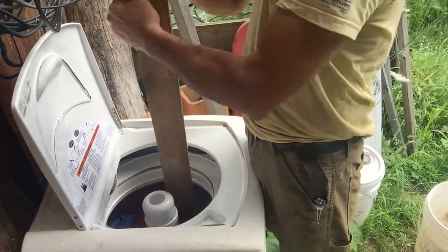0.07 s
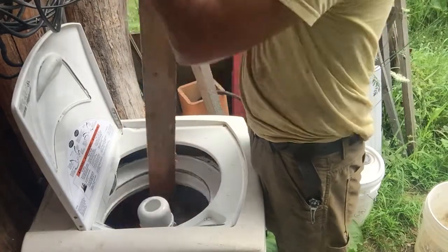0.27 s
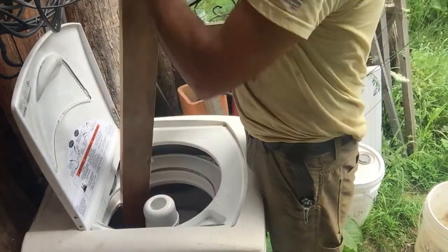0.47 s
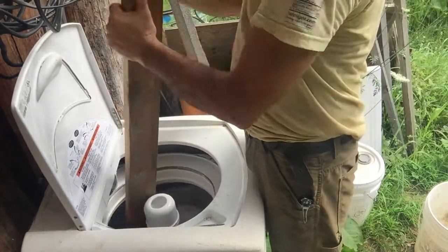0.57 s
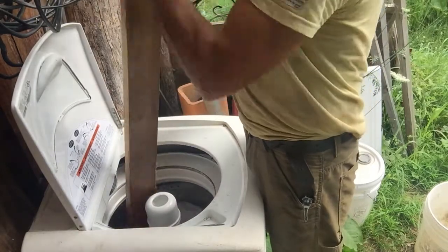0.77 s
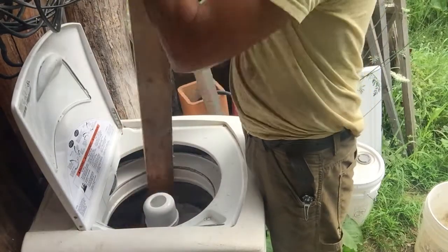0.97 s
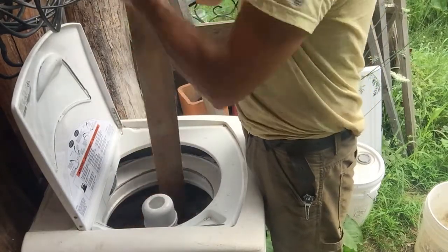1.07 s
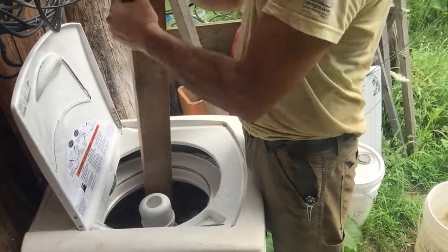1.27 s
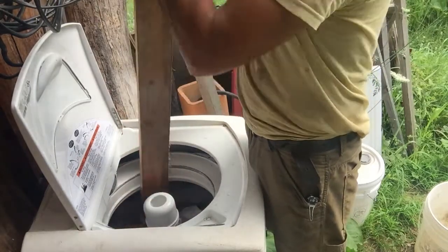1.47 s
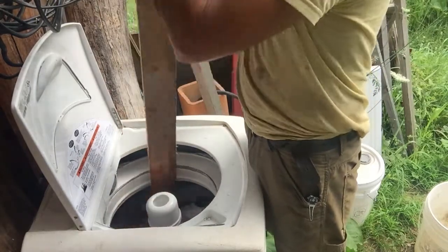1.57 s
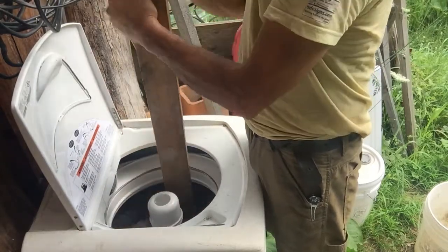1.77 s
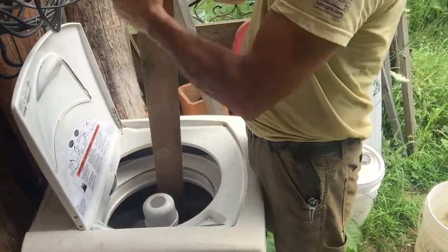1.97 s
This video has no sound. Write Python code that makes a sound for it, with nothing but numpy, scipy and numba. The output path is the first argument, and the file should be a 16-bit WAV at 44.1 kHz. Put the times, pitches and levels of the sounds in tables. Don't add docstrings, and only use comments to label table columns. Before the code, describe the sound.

Splashing water and wet slaps from laundry worked with a wooden board in a washer tub, low cabinet thuds and thin trickling between pushes, one brief bird cry midway, quiet outdoors, mono handheld phone pickup.

```python
import sys
import numpy as np
from scipy import signal
from scipy.fft import rfft, irfft
from scipy.io import wavfile
from scipy.ndimage import uniform_filter1d
from numba import njit

SR = 44100
rng = np.random.default_rng(int(sys.argv[2]) if len(sys.argv) > 2 else 0)


def gain_from_db(level_db):
    decades = np.asarray(level_db, float) / 20
    return 10 ** decades


def dump_mix(stems):
    frames = np.atleast_2d(stems).T
    limited = np.clip(frames, -1, 1)
    pcm = np.round(limited * 32767).astype(np.int16)
    wavfile.write(sys.argv[1], SR, pcm)


N = 89258


def level(x, db):
    return x * gain_from_db(db) / np.sqrt(np.mean(x ** 2))


def noise(shape):
    hz, db = np.array(shape, float).T
    f = np.arange(1, N // 2 + 2) * SR / N
    gain = gain_from_db(np.interp(np.log(f), np.log(hz), db))
    return level(irfft(rfft(rng.standard_normal(N)) * gain, N), 0)


def walk(rate_hz):
    hold = int(SR / rate_hz)
    steps = np.repeat(rng.standard_normal(N // hold + 1), hold)
    return 1.3 * uniform_filter1d(uniform_filter1d(steps, hold), hold)[:N]


def swell(peak_s, rise_s, fall_s, db):
    t = np.arange(N) / SR - peak_s
    away = np.where(t < 0, -t / max(rise_s, .003), t / max(fall_s, .003))
    return gain_from_db(2 * (db - 30 * away))


@njit
def grains(count, at, hz, t60, size, glide):
    out = np.zeros(count)
    for g in range(len(at)):
        span, phase = int(t60[g] * SR), 0.
        for i in range(min(span, count - at[g])):
            phase += 2 * np.pi * hz[g] * (1 + glide * i / span) / SR
            out[at[g] + i] += size[g] * min(phase / 7, 1.) * np.exp(-7 * i / span) * np.sin(phase)
    return out


def drops(centre_hz, spread_oct, cycles, scatter_db, count):
    loudest_db, glide = 11, 0.16
    at = rng.integers(0, N, count)
    hz = np.clip(centre_hz[at] * 2 ** (spread_oct * rng.standard_normal(count)), 300, 15000)
    size = gain_from_db(np.minimum(scatter_db * rng.exponential(size=count), loudest_db))
    return level(grains(N, at, hz, 2 * cycles / hz, size, glide), 0)


def bubbles(table):
    s, hz, db, t60 = np.array(table).T.copy()
    return grains(N, (s * SR).astype(np.int64), hz, t60, gain_from_db(db), .06)


# (time [s], level [dB])
TRICKLE_LEVEL = [(0, -56.5), (.22, -83), (.27, -62), (.54, -62), (.8, -62), (.9, -76.5), (1.11, -75.5),
                 (1.5, -75.5), (1.6, -66), (1.8, -66), (2.02, -58.5)]
# (frequency [Hz], level [dB per Hz])
TRICKLE_HISS = [(150, -11), (900, -6.5), (1800, 4.5), (2600, -8.5), (3600, -6), (5200, -8), (7000, -24),
                (16000, -45)]


def trickle():
    s, db = np.array(TRICKLE_LEVEL).T
    pitch_hz = np.full(N, 1704.)
    shower = drops(pitch_hz, spread_oct=.2, cycles=14, scatter_db=4, count=1500)
    wet = gain_from_db(-8.5) * shower + noise(TRICKLE_HISS)
    return wet * gain_from_db(np.interp(np.arange(N) / SR, s, db) + 1.2 * walk(24.67))


# (frequency [Hz], level [dB per Hz])
YARD_SPECTRUM = [(20, 0.5), (100, -8), (300, -16), (550, -9), (900, -18), (3200, -14), (6000, -26.5),
                 (16000, -37.5)]


def yard():
    return noise(YARD_SPECTRUM) * gain_from_db(-68.5 + 2.05 * walk(3.77))


# (peak time [s], rise [s per 30 dB], fall [s per 30 dB], level [dB], hardness [dB])
THUDS = [(0.1307, 0, 0.087, -48, -5), (0.576, 0.0146, 0.17, -49, 1.5), (0.692, 0.17, 0.04, -48, 3.5),
         (0.7623, 0.15, 0.14, -47.5, -6), (1.1618, 0.04, 0.1, -57, 2), (1.3156, 0.22, 0.18, -57.5, 4),
         (1.379, 0.2, 0.1, -48.5, -9.5), (1.827, 0.12, 0.38, -53.6, -3), (2.0253, 0.13, 0.095, -49.5, -5),
         (0.4194, 0.025, 0.15, -66.0, 3), (1.5744, 0.061, -0.16, -70, 5),
         (1.9796, -0.02, -0.23, -54.5, 2.5), (0.008, 0.5, -0.1, -63.5, -1),
         (0.2481, 0.101, 0.1, -69.5, 3.5), (0.509, .02, -0.06, -63, 3)]
# (frequency [Hz], level [dB per Hz])
THUD_SPECTRUM = [(25, -2), (60, -4), (130, -6), (250, -9), (550, -9), (1100, -14), (2000, -46)]


def thuds():
    boom = noise(THUD_SPECTRUM)
    boom = boom / np.sqrt(uniform_filter1d(boom ** 2, size=1800))
    split_hz = 310
    low = signal.sosfiltfilt(signal.butter(2, split_hz, fs=SR, output="sos"), boom)
    deep = np.sqrt(sum(swell(*row[:4]) for row in THUDS))
    hard = np.sqrt(sum(swell(*row[:4]) * gain_from_db(2 * row[4]) for row in THUDS))
    return (deep * low + hard * (boom - low)) * gain_from_db(3.0)


# (peak time [s], rise [s per 30 dB], fall
# [s per 30 dB], level [dB], droplet pitch [Hz])
SURGES = [(0.0143, 0.068, 0.108, -50.7, 2800), (0.0432, 0.16, 0.023, -40.6, 3200),
          (0.099, 0.07, 0.125, -40.5, 2900), (0.1691, 0.129, 0.094, -52.1, 3200),
          (0.3446, 0.035, 0.045, -51.3, 2200), (0.422, 0.031, 0.056, -55.4, 2500),
          (0.5045, 0.003, 0.04, -54.5, 2200), (0.5722, 0.004, 0.04, -23.5, 4600),
          (0.6, 0.05, 0.134, -33.2, 4000), (0.683, 0.019, 0.085, -28.5, 3700),
          (0.708, 0.016, 0.035, -24, 3200), (0.7358, 0.05, 0.13, -34, 3200),
          (0.791, 0.09, 0.035, -36.5, 3600), (1.1607, 0.025, 0.098, -43.8, 2500),
          (1.1975, 0.081, 0.09, -50.9, 7500), (1.2657, 0.099, 0.193, -43.3, 3800),
          (1.3133, 0.07, 0.108, -40.2, 3300), (1.3485, 0.12, 0.02, -42.9, 2000),
          (1.4098, 0.16, 0.038, -47.2, 2500), (1.4317, 0.017, 0.06, -46, 5000),
          (1.5558, 0.037, 0.131, -52.8, 2200), (1.8165, 0.012, 0.06, -30, 4400),
          (1.8675, 0.035, 0.06, -37, 3000), (1.971, 0.058, 0.067, -42.2, 4200),
          (0.2385, 0.003, 0.06, -43.5, 3200), (0.245, 0.012, 0.015, -41.5, 2600),
          (0.3176, 0.005, 0.045, -51.2, 3500), (0.5649, 0.003, 0.121, -42.5, 4500),
          (0.6704, 0.006, 0.119, -39.6, 5500), (0.7259, 0.003, 0.026, -32.4, 7000),
          (0.9518, 0.004, 0.045, -55.4, 4000), (1.15, 0.02, 0.12, -54, 5200),
          (1.9439, 0.003, 0.041, -45.8, 4000), (0.0692, 0.01, 0.053, -48.7, 3000),
          (1.456, 0.03, 0.04, -58, 2500), (1.9101, 0.016, 0.033, -49.4, 2800),
          (1.9855, 0.078, 0.026, -47.3, 3200), (2.0097, 0.02, 0.099, -53.6, 5500),
          (1.8075, 0.016, 0.073, -35, 4500)]
# (frequency [Hz], level [dB per Hz])
SPRAY_SPECTRUM = [(150, -23.5), (500, -14), (950, -11), (1400, -5.5), (4200, -4.5), (6500, -14.5),
                  (11000, -25), (16000, -38.5)]


def surges():
    pushes = SURGES
    power = np.array([swell(*row[:4]) for row in pushes]) + 1e-14
    total = power.sum(0)
    pitch_hz = np.exp(np.log([row[4] for row in pushes]) @ power / total)
    spray = noise(SPRAY_SPECTRUM) * gain_from_db(-4.5 + 2.45 * walk(90))
    shower = drops(pitch_hz, spread_oct=0.46, cycles=5.55, scatter_db=5.5, count=11000)
    return np.sqrt(total) * (spray + gain_from_db(-2.5) * shower)


# (time [s], pitch [Hz], peak level [dB], time to fade 60 dB [s])
DRIPS = [(.022, 1490, -48, .03), (.024, 3870, -42, .02), (.098, 2430, -34.5, 0.021),
         (.102, 3270, -35.5, .015), (.136, 3000, -39, .02), (0.2388, 3310, -39.5, 0.038),
         (0.2388, 1510, -40, 0.058), (.318, 4100, -45, 0.018), (.324, 1250, -50, 0.054),
         (.417, 1400, -51, 0.018), (.504, 1400, -48, 0.026), (.507, 715, -55, 0.037),
         (.577, 1500, -27, .015), (.592, 4230, -30, .015), (.609, 1890, -29, 0.023),
         (.6805, 3500, -21.5, 0.0074), (.685, 4460, -22.5, .01), (.689, 3600, -24, .01),
         (.7075, 3830, -20, 0.011), (.714, 2020, -24.5, 0.016), (.787, 3400, -31, 0.011),
         (1.083, 5020, -55.5, 0.014), (1.128, 4600, -59, .02), (1.229, 11000, -54, .006),
         (1.162, 1520, -39, .03), (1.236, 840, -50.5, 0.042), (1.283, 1205, -44.5, 0.039),
         (1.311, 870, -44, 0.038), (1.312, 1490, -45, 0.086), (1.33, 1780, -46, 0.046),
         (1.35, 1520, -41, 0.028), (1.408, 1150, -46.5, .03), (1.555, 1515, -51, 0.052),
         (1.558, 650, -55.5, 0.037), (1.596, 520, -55, .03), (1.6, 1050, -55, 0.034),
         (1.709, 1850, -55.5, .03), (1.8064, 6700, -27.5, 0.014), (1.8075, 3300, -31, 0.007),
         (1.8183, 4400, -19, 0.0094), (1.829, 3940, -25, .008), (1.838, 1900, -27.5, .012),
         (1.8657, 2730, -30, 0.014), (1.869, 2780, -29, 0.019), (1.951, 3240, -39.5, .015),
         (1.968, 4850, -36.5, 0.017)]


def drips():
    return bubbles(DRIPS)


# (time [s], pitch [Hz], peak level [dB], time to fade 60 dB [s])
GULPS = [
    (.105, 113, -46, 0.087),
    (.128, 172, -43, 0.063),
    (1.355, 230, -51, 0.056),
    (1.37, 167, -46, 0.056),
    (1.375, 324, -48, .04),
    (1.2, 70, -51, 0.088),
    (.7, 537, -38, 0.057),
]


def gulps():
    return bubbles(GULPS)


# (time [s], peak level [dB], ring pitch [Hz], time to fade 60 dB [s])
SLAPS = [(.2383, -56, 3600, 0.011), (.244, -40, 2390, 0.024), (.5706, -6.5, 5070, 0.0078),
         (0.5718, -12, 5600, 0.0048), (.5712, -15, 3040, .012), (.699, -17.5, 4100, 0.0059),
         (0.7049, -14.5, 3000, 0.01), (.752, -22, 3550, 0.0099), (.953, -47.5, 3550, 0.012),
         (1.04, -55.5, 4500, .012), (1.408, -50, 7650, 0.0125), (1.8143, -13, 4460, 0.012),
         (1.8655, -30, 3380, 0.01), (1.945, -46.5, 3546, 0.036)]
# (pitch ratio [times ring pitch], level [dB])
SLAP_RING = [(.45, -19), (0.599, -15), (.8, -23), (0.922, -2), (1.001, 5), (1.12, -4), (1.271, 1.5),
             (1.702, -15), (2.2, -15)]


def slaps():
    s, db, hz, t60 = np.array(SLAPS).T[:, :, None]
    ratio, ring_db = np.array(SLAP_RING).T
    delay, detune = rng.random((2, len(SLAPS), len(ratio)))
    at = ((s + 0.0003 * delay ** 2) * SR).astype(np.int64)
    ring_hz = np.minimum(hz * ratio * (0.936 + .12 * detune), 16000)
    ring_t60 = t60 / np.sqrt(ratio)
    ring_size = gain_from_db(db + ring_db - 7.0)
    ring = grains(N, at.ravel(), ring_hz.ravel(), ring_t60.ravel(), ring_size.ravel(), 0.)
    knock_hz, knock_t60 = np.full(len(SLAPS), 437.0), np.full(len(SLAPS), .012)
    knock = grains(N, at[:, 0].copy(), knock_hz, knock_t60, gain_from_db(db[:, 0] - 20), 0.)
    return ring + knock


# (pitch [Hz], level [dB], time to fade 60 dB [s])
RIM_TONES = [(3000, -7.5, .12), (3600, -12, .1), (4780, 5, 0.14), (5700, -4, 0.24)]
# (time [s], level [dB])
RIM_TAPS = [
    (.418, -66),
]


def rim():
    rings = [(s * SR, hz, t60, tap_db + tone_db) for s, tap_db in RIM_TAPS for hz, tone_db, t60 in RIM_TONES]
    at, hz, t60, db = np.array(rings).T
    return grains(N, at.astype(np.int64), hz.copy(), t60.copy(), gain_from_db(db), 0.)


# (centre time [s], pitch [Hz], level [dB], length [s])
COOS = [
    (1.37, 810, -58, 0.02),
    (1.388, 840, -57, .02),
    (1.427, 800, -58, 0.03),
    (1.48, 830, -63, .026),
    (1.535, 860, -62.5, 0.026),
    (0.731, 1275, -45.5, 0.042),
    (.79, 1286, -45.5, 0.035),
]


def coos():
    t = np.arange(N) / SR
    rise_hz_per_s = 1500
    out = np.zeros(N)
    for centre, hz, db, length in COOS:
        since = t - centre
        tone = np.sin(2 * np.pi * (hz + rise_hz_per_s * since / 2) * since)
        out += gain_from_db(db + 4) * np.exp(-8 * (since / length) ** 2) * tone
    return out


# (time [s], pitch [Hz], level [dB])
CRY = [
    (.732, 535.2, -60),
    (0.749, 554.8, -44),
    (.783, 565.7, -45),
    (.83, 562.2, -47),
    (.912, 547.4, -56.5),
    (.96, 553.3, -59),
    (1.068, 544.4, -63.5),
    (1.092, 520, -71),
    (1.112, 500, -77),
]
# (multiple of the pitch [times], level [dB])
CRY_OVERTONES = [(1, -23), (2, -11.5), (3, 1.6), (4, -16), (5, -12), (6, -23), (7, -29.5), (8, -25)]


def cry():
    t = np.arange(N) / SR
    s, hz, db = np.array(CRY).T
    pitch_hz = np.interp(t, s, hz) * (1 + 0.005 * walk(60))
    phase = 2 * np.pi * np.cumsum(pitch_hz) / SR
    effort_db = np.interp(t, s, db, -140, -140)
    faded_db = np.clip(db.max() - effort_db, 0, 36)
    out = np.zeros(N)
    for k, overtone_db in CRY_OVERTONES:
        slower_fade_db = (abs(k - 3.5) > 1) * 0.3 * faded_db
        flicker_db = 3 * walk(30.02)
        gain = gain_from_db(effort_db + 1.5 + overtone_db + slower_fade_db + flicker_db)
        out += gain * np.sin(round(k) * phase)
    return out


def tub_echo(water):
    first_s, t60_s, echo_db = 0.0018, 0.028, -12.5
    t = np.arange(int(.08 * SR)) / SR
    tub = rng.standard_normal(len(t)) * gain_from_db(-60 * t / t60_s) * (t > first_s)
    return signal.fftconvolve(water, tub / np.sqrt(np.sum(tub ** 2)))[:N] * gain_from_db(echo_db)


def scene():
    water = trickle() + surges() + drips() + slaps() + rim()
    low_cut_hz = 251
    water = signal.sosfilt(signal.butter(2, low_cut_hz, "high", fs=SR, output="sos"), water)
    around = yard() + thuds() + gulps() + coos() + cry()
    return (water + tub_echo(water) + around)[None]


def top_cut(x):
    return signal.sosfilt(signal.butter(12, 16500, fs=SR, output="sos"), x)


def record(dry):
    soft = signal.sosfilt(signal.butter(6, 15300, fs=SR, output="sos"), dry)
    return top_cut(soft)


dry = scene()
out = record(dry)
dump_mix(out)
```